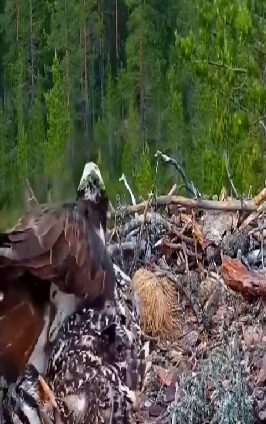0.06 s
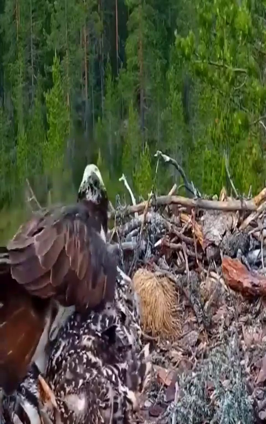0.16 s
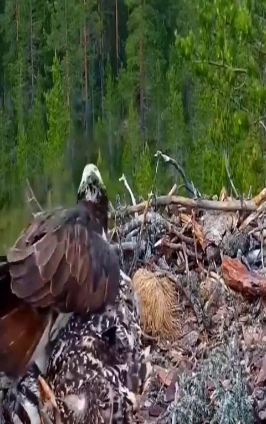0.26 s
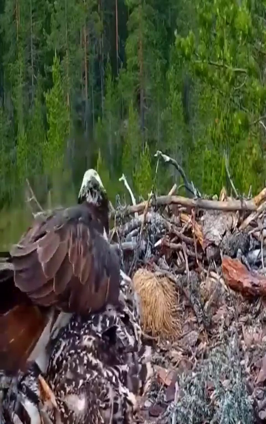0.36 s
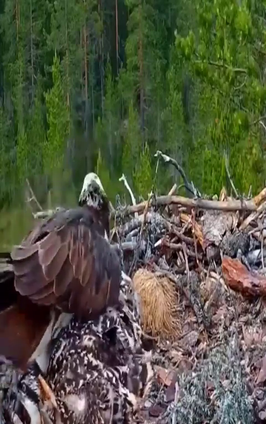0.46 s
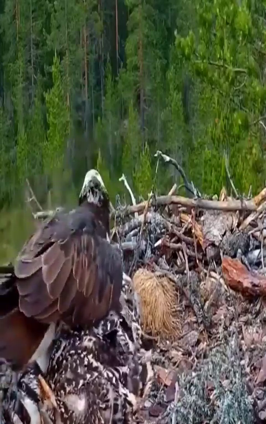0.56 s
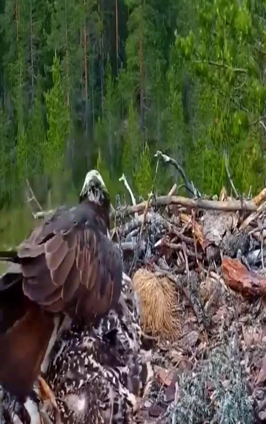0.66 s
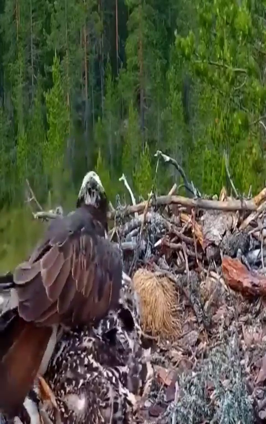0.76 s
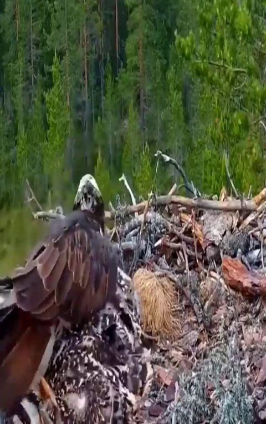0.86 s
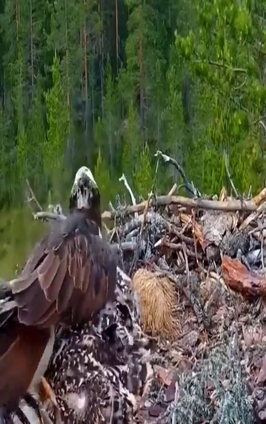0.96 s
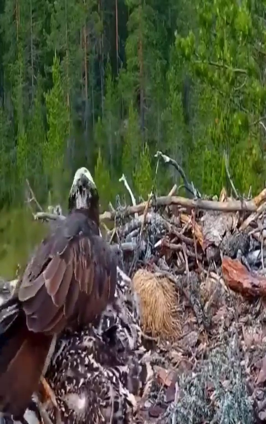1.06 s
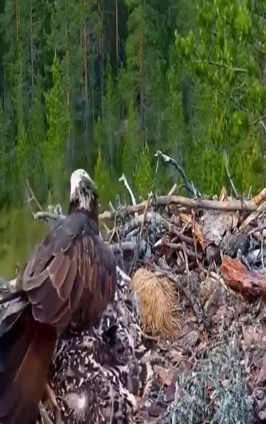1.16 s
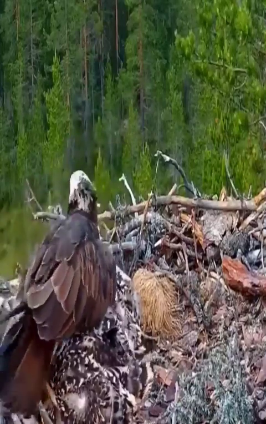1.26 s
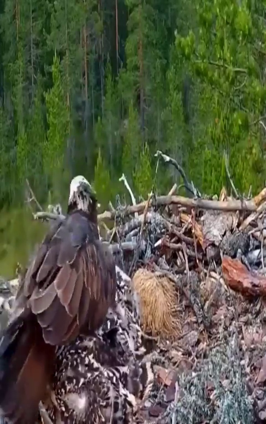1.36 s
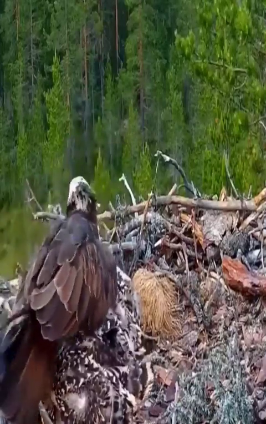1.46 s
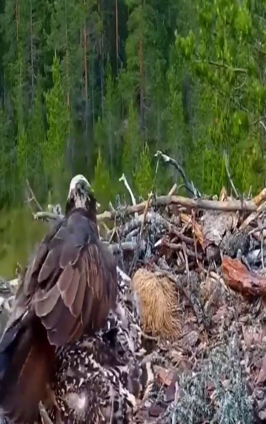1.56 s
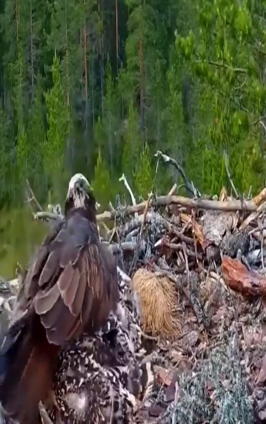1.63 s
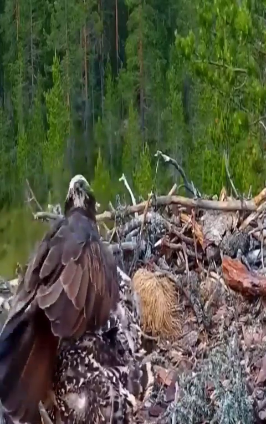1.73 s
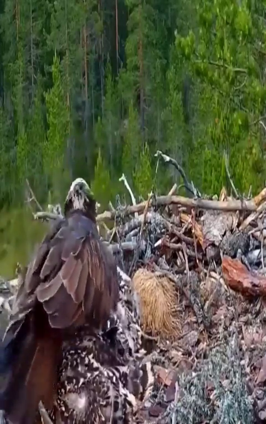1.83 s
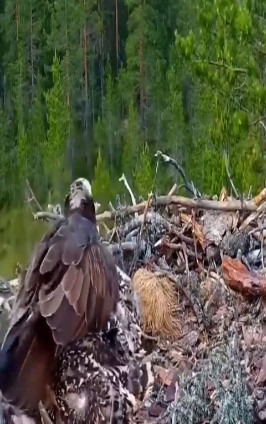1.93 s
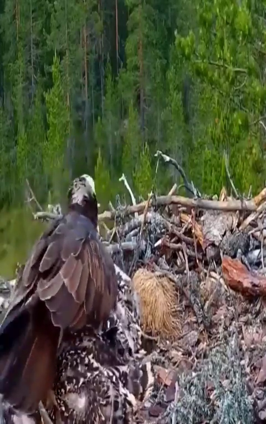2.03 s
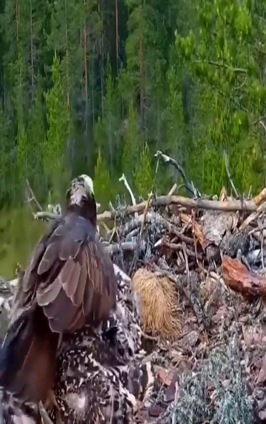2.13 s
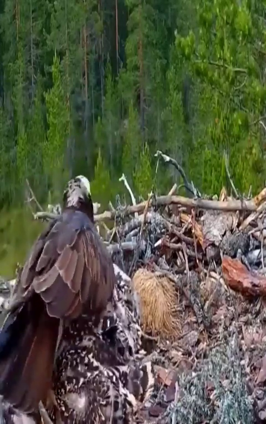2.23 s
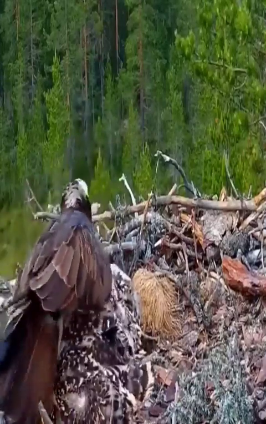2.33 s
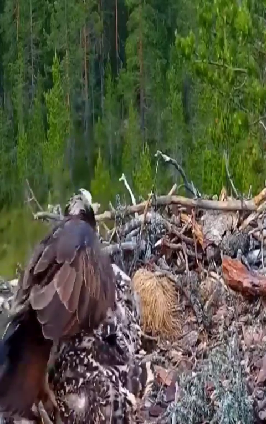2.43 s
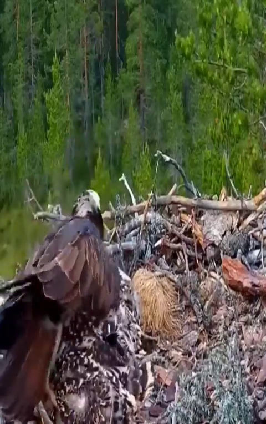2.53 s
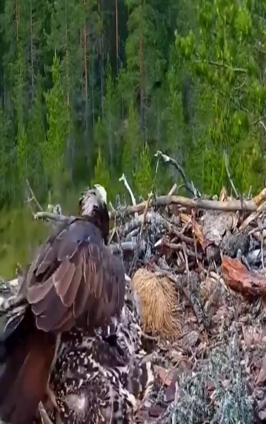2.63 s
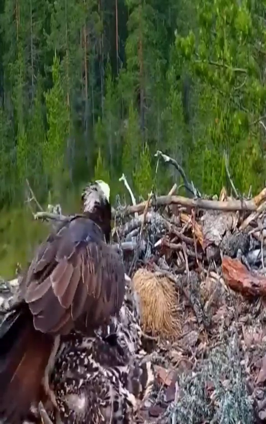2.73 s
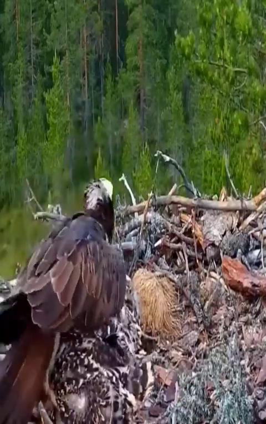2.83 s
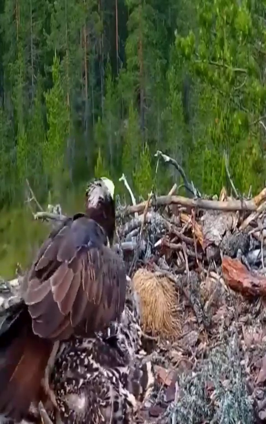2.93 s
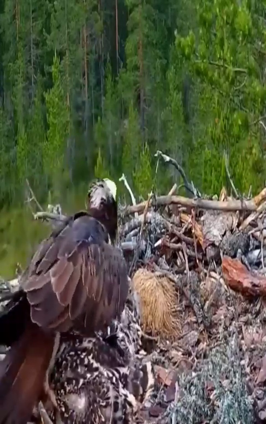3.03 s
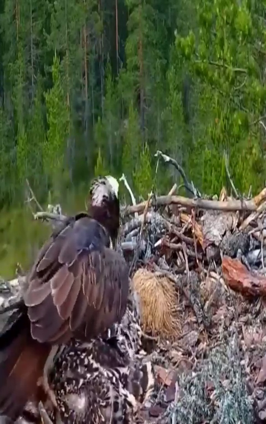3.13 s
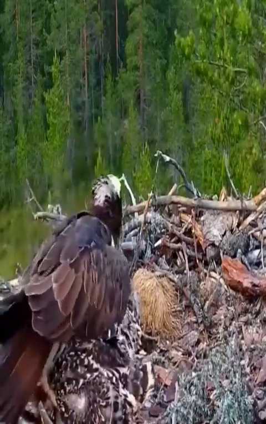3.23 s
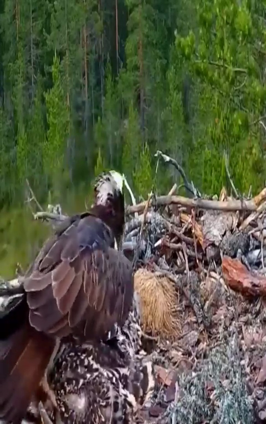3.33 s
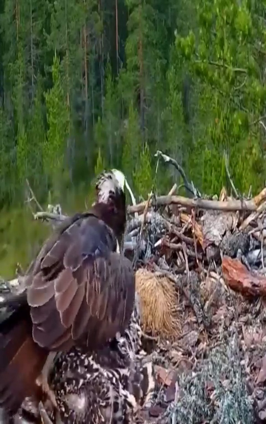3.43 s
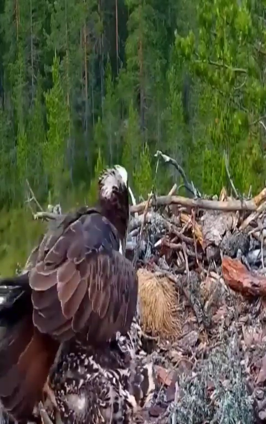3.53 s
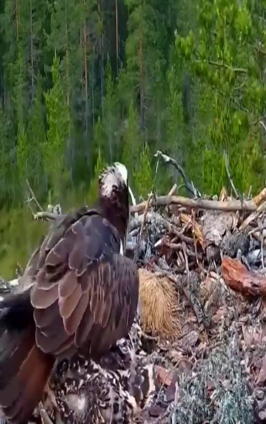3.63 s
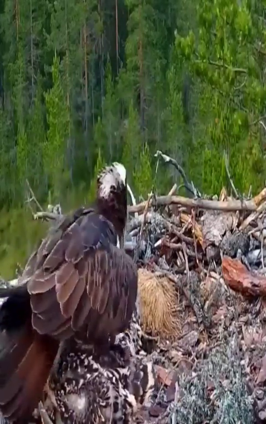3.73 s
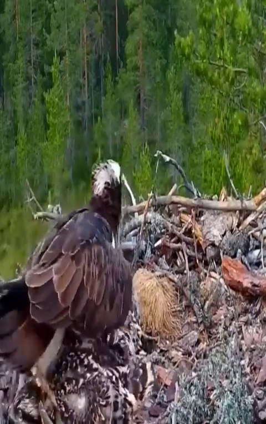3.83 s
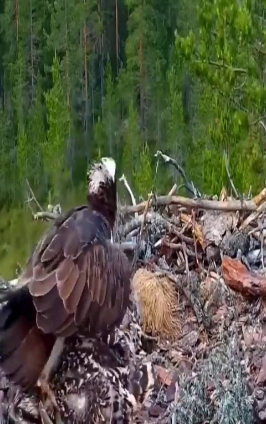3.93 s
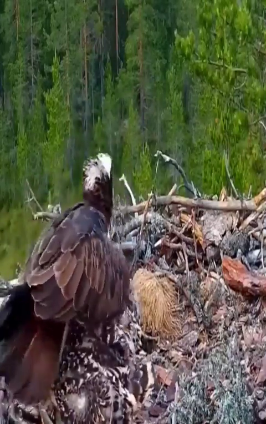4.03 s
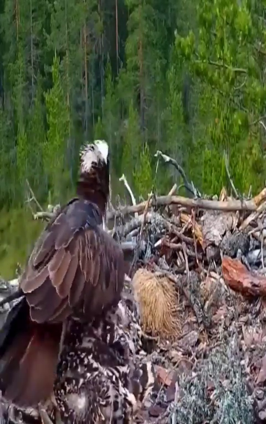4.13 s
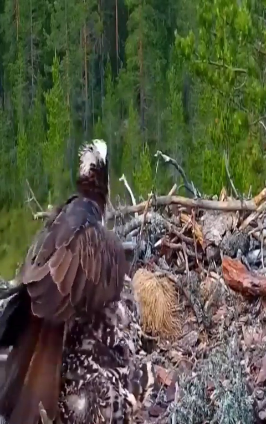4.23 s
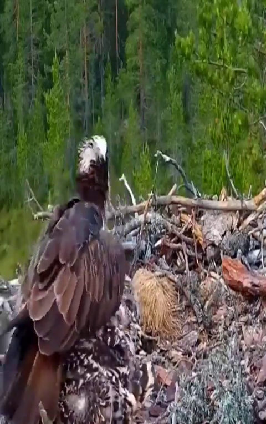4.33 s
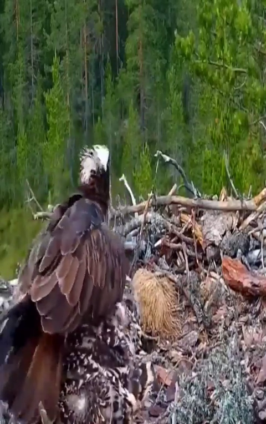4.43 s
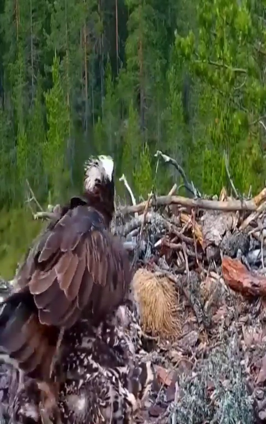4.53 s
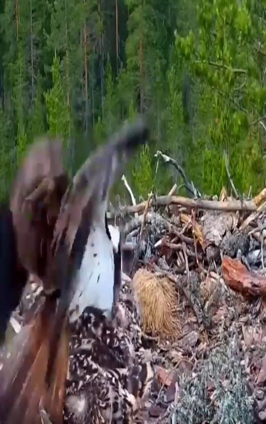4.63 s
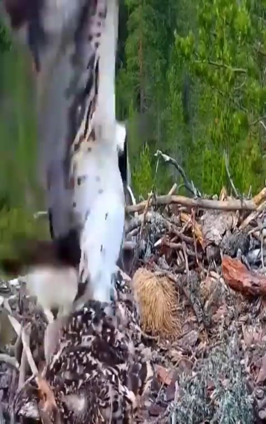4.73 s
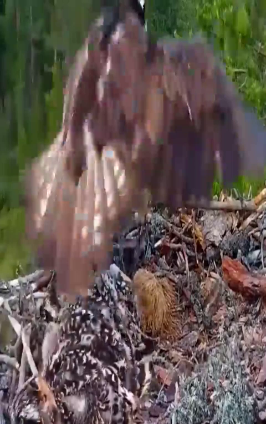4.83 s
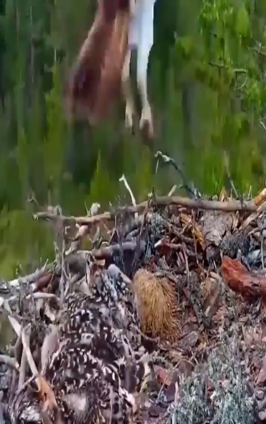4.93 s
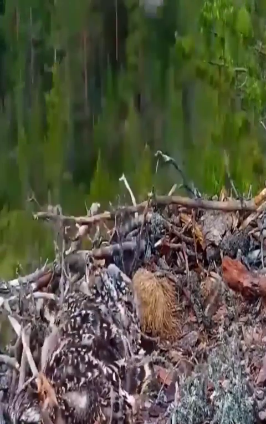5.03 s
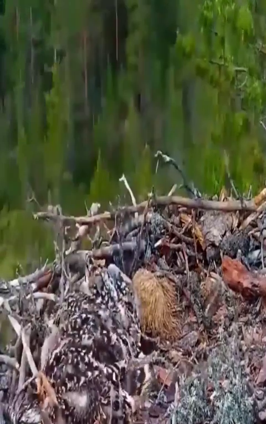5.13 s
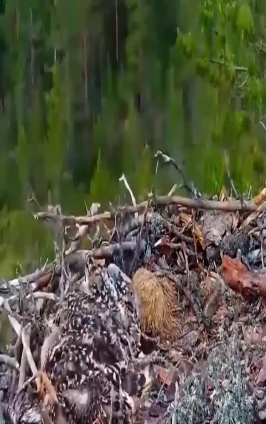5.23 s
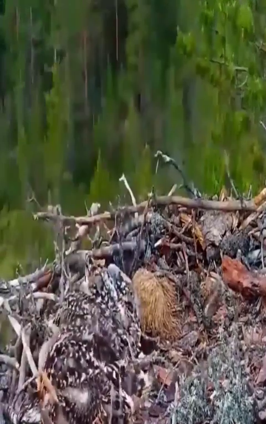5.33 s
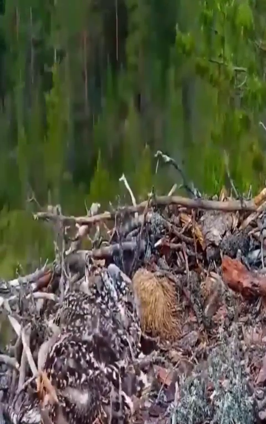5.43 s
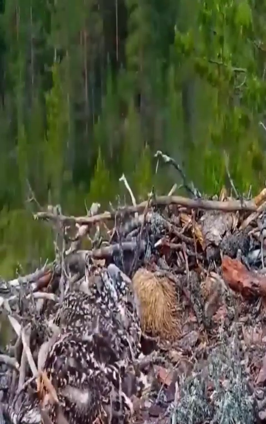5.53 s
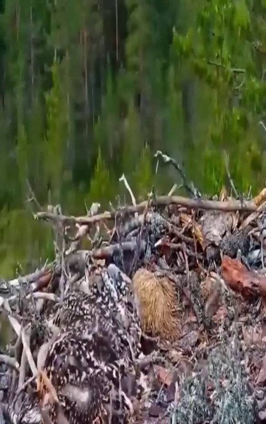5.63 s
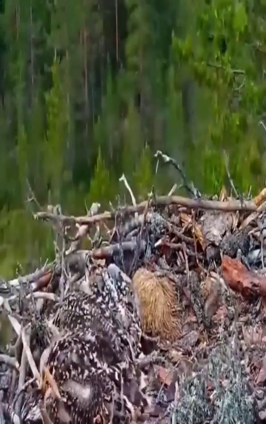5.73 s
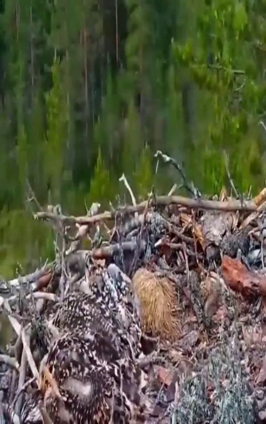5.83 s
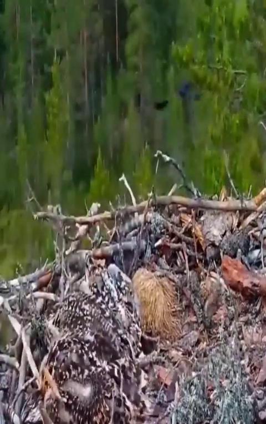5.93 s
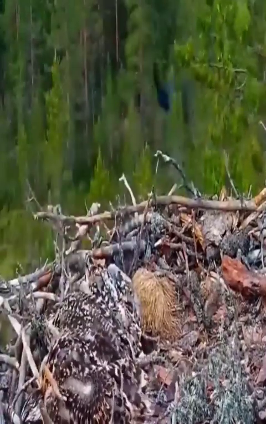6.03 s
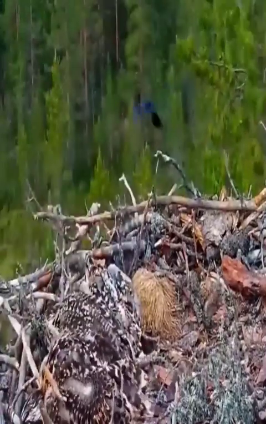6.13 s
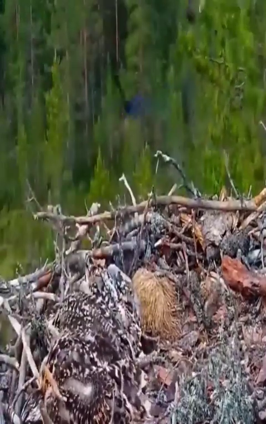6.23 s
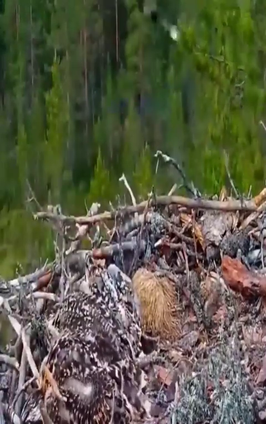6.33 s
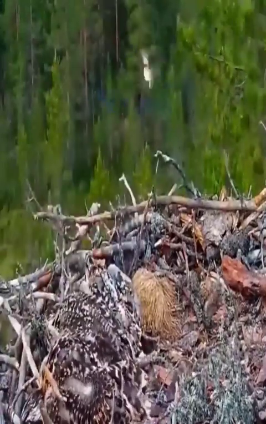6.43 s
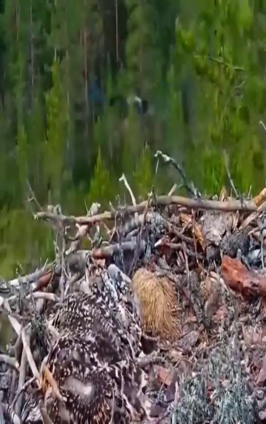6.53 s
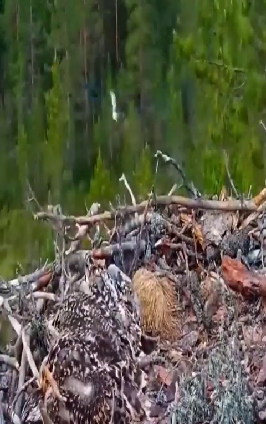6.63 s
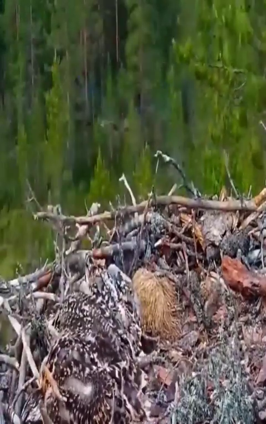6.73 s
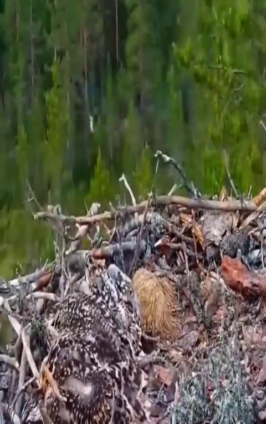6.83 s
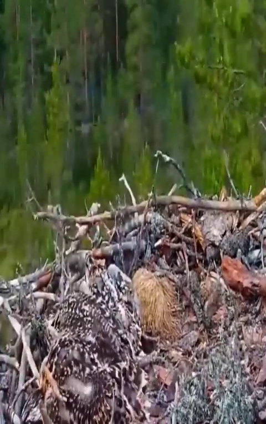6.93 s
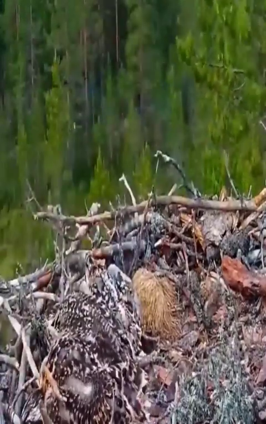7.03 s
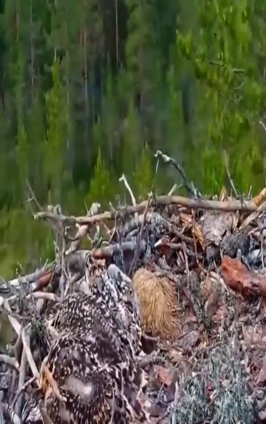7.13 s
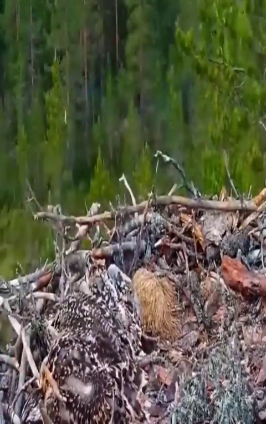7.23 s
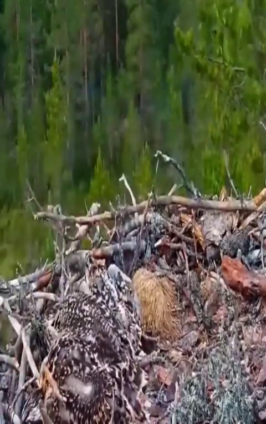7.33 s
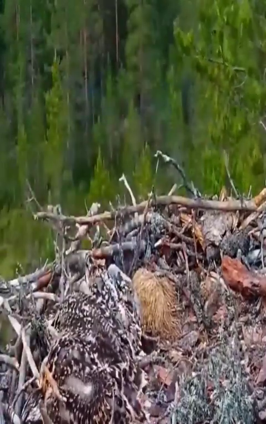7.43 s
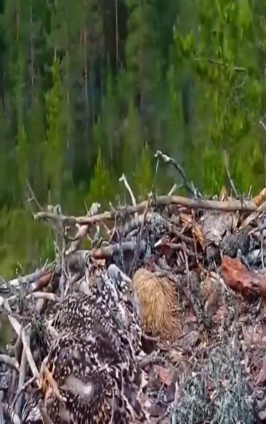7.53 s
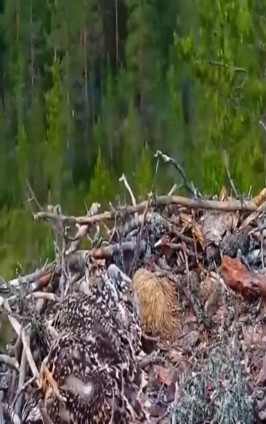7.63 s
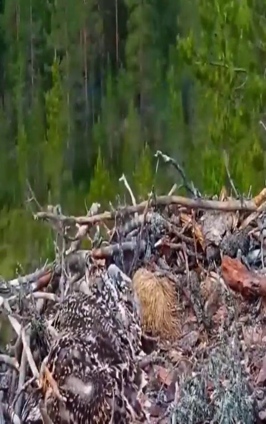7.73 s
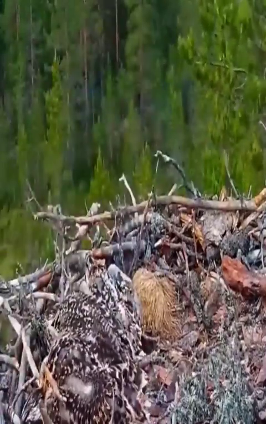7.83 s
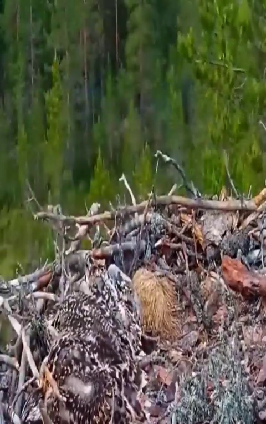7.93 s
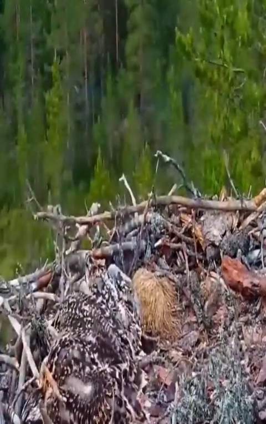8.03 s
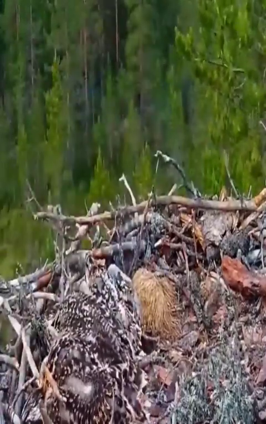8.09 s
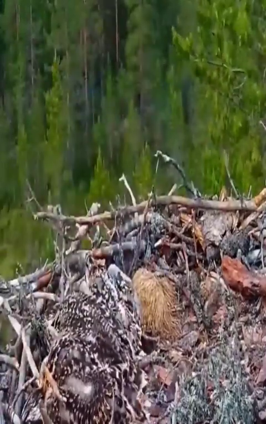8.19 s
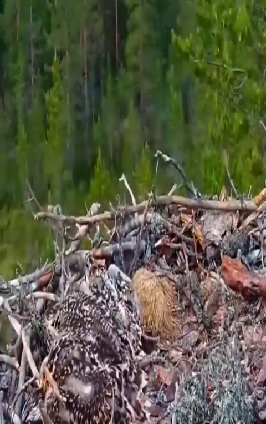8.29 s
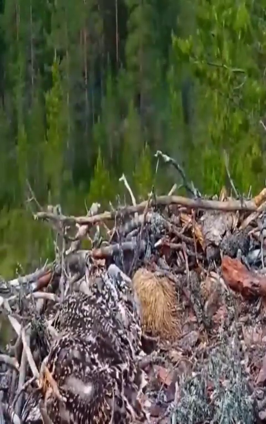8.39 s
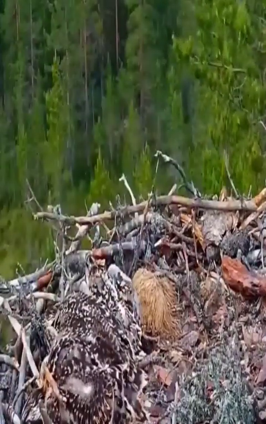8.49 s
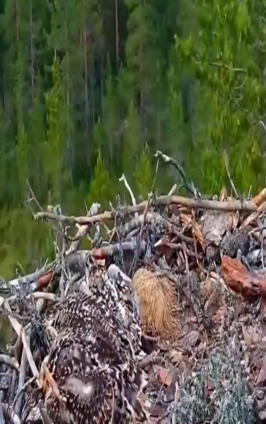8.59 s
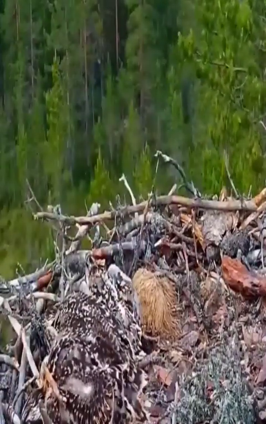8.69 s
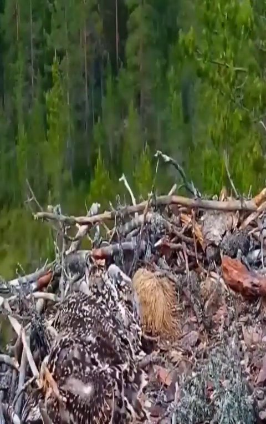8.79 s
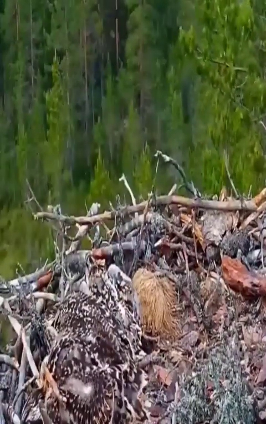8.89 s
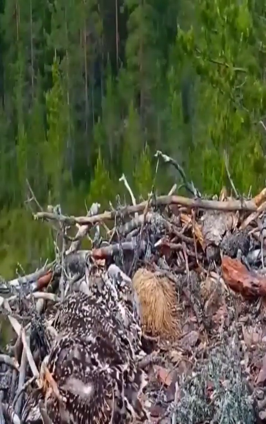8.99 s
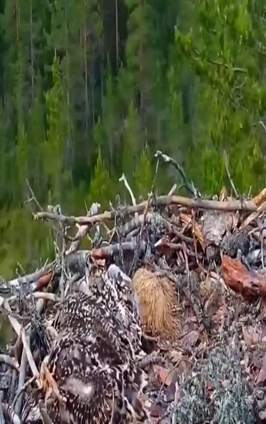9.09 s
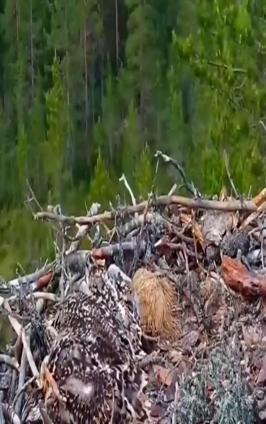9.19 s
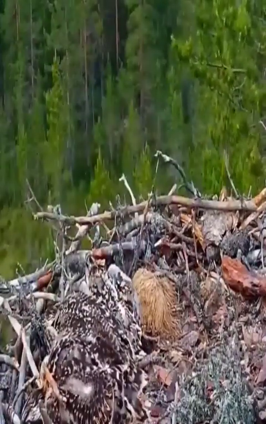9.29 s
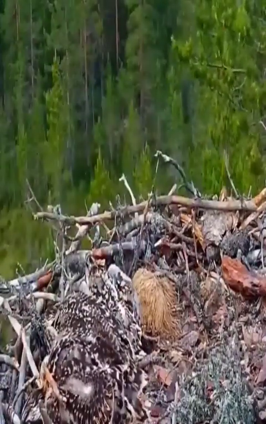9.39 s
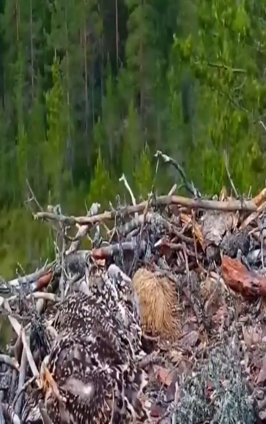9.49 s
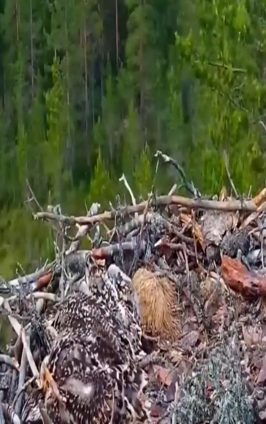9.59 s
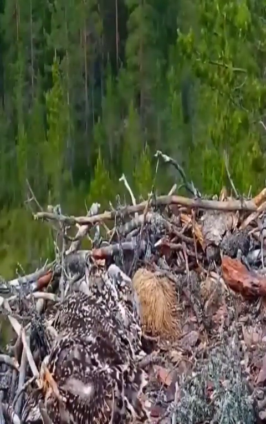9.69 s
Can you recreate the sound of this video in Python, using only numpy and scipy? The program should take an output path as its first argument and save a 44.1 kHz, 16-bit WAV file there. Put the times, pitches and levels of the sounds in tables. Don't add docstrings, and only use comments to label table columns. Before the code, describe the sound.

A fast, even string of loud, rasping bird chirps opens at once, swelling to clearer, near-pure whistles midway, then turning rougher and duller before one bright final shriek. A brief dense crackle of sticks and feathers follows at take-off. Afterwards only small, breathy, hoarse calls remain, scattered and fading in a quiet forest clearing. The close microphone strains on the loud whistles with fizz and low bumps.

```python
import sys
import numpy as np
from scipy import signal
from scipy.fft import rfft, irfft
from scipy.io import wavfile
from scipy.ndimage import uniform_filter1d

SR = 44100
rng = np.random.default_rng(int(sys.argv[2]) if len(sys.argv) > 2 else 0)


def master_out(mix):
    frames = np.transpose(np.atleast_2d(mix))
    ceiling = np.clip(frames, -1, 1)
    pcm = np.round(ceiling * 32767).astype(np.int16)
    wavfile.write(sys.argv[1], SR, pcm)


def undo_db(level):
    steps = np.asarray(level, float) / 20
    return 10 ** steps


N = 429975
TIME = np.arange(N) / SR
DEAD_BAND_HZ = 7950


def rms_one(x):
    return x / np.sqrt(np.mean(x ** 2) + 1e-20)


def smooth_twice(x, samples):
    return uniform_filter1d(uniform_filter1d(x, size=samples), size=samples)


def drift(rate_hz):
    r = np.exp(-2 * np.pi * rate_hz / SR)
    settle = 9000
    return rms_one(signal.lfilter([1], [1, -2 * r, r * r], rng.standard_normal(N + settle))[settle:])


def coloured(x, spectrum):
    hz, db = np.transpose(spectrum)
    grid = np.maximum(np.arange(N // 2 + 1) * SR / N, 1)
    shape_db = np.interp(np.log(grid), np.log(hz), db)
    return rms_one(irfft(rfft(x) * undo_db(shape_db), N))


def cut_low(x, hz):
    return signal.sosfilt(signal.butter(4, hz, "high", fs=SR, output="sos"), x)


def cut_high(x, order, hz):
    return signal.sosfilt(signal.butter(order, hz, fs=SR, output="sos"), x)


def resonate(x, modes, patchy_db):
    out = 0
    for k, (hz, width, db) in enumerate(modes):
        r = np.exp(-np.pi * width / SR)
        top = np.array([1, 0, -1]) * (1 - r * r) / 2
        ring = signal.lfilter(top, [1, -2 * r * np.cos(2 * np.pi * hz / SR), r * r], x)
        out = out + (-1) ** k * undo_db(db + patchy_db * drift(20.7)) * ring
    return out / np.sqrt(smooth_twice(out ** 2, 700) + 1e-12)


def membrane(rate, restart, jitter, uneven_db, breath):
    cycles = np.cumsum(rate * np.clip(1 + jitter * drift(150), .3, 3) / SR)
    cycles -= np.maximum.accumulate(np.where(restart, cycles - 1 + 10 / SR, 0))
    snaps = (np.diff(np.floor(cycles), prepend=0) > 0) * undo_db(uneven_db * drift(340))
    airflow = .7 + rms_one(signal.lfilter([1], [1, -.985], snaps))
    puff = rms_one(airflow) * rng.standard_normal(N)
    return rms_one(snaps) * np.sqrt(1 - breath) + puff * np.sqrt(breath)


def shaped(calls, breath_db, lead, attack, tail, tail_db):
    softer_per_db = 1.2
    level_db = np.full(N, -120.)
    for start, end, early_db, middle_db, late_db, _ in calls:
        opened = start + attack * (1 + softer_per_db * max(middle_db - early_db, 0))
        held = start + (end - start) * np.array([.25, .4, .62, .75, .9])
        times = [start - lead, start, opened, *held, end + .004, end + tail]
        levels = [early_db + 2 * breath_db, early_db + breath_db, early_db + 0.5, early_db, middle_db,
                  middle_db, late_db, late_db - 1.5, late_db + tail_db, late_db - 55.0]
        call_db = np.interp(TIME, np.sort(times), levels, left=-120, right=-120)
        level_db = np.maximum(level_db, call_db)
    starts, bright_db = np.array(calls)[:, 0], np.array(calls)[:, 5]
    which = np.maximum(np.searchsorted(starts, TIME + .003) - 1, 0)
    return level_db, uniform_filter1d(bright_db[which], size=400), TIME - starts[which]


def trees(x, level_db, t60):
    t = np.arange(SR // 4) / SR
    tail = rng.standard_normal(len(t)) * undo_db(-60 * t / t60) * (t > .004)
    return undo_db(level_db) * signal.fftconvolve(x, tail / np.sqrt(np.sum(tail ** 2)))[:N]


# f/Hz, level/dB [per Hz]
FOREST_COLOUR = [(59, -71.5), (100, -32), (718, -24), (1090, -11), (4450, -4), (5150, -7.5), (9860, -14),
                 (14200, -26), (14500, -45)]


def forest():
    return undo_db(-70 + 0.41 * drift(6.7)) * coloured(rng.standard_normal(N), FOREST_COLOUR)


# f/Hz, width [Hz], level/dB
CLEARING_MODES = [(1754, 140, -1.5), (2720, 180, -1.5), (3900, 200, 0.5)]
# t/s, level/dB
CLEARING_LEVEL = [
    (8.2, -88),
    (8.4, -70),
    (8.95, -64),
    (9.5, -68.5),
    (9.68, -83),
]


def clearing():
    level_db = np.interp(TIME, *np.transpose(CLEARING_LEVEL), left=-120)
    return undo_db(level_db) * resonate(rng.standard_normal(N), CLEARING_MODES, 1.5)


# start t/s, length [s], level/dB, brightness [dB]
FAR_CALLS = [(4.558, 0.089, -51.5, 5.5), (5.004, 0.078, -44, 2), (5.179, 0.061, -50, -4),
             (5.342, 0.096, -45.5, -1), (5.446, 0.065, -52, -0.5), (5.595, 0.026, -55.5, 0),
             (5.656, 0.086, -49, 0), (5.98, 0.09, -51.5, 0), (6.365, 0.079, -54, -7),
             (6.775, 0.076, -56.5, -4.5), (7.195, 0.16, -60, -5.5), (7.588, 0.16, -60, -5.5),
             (7.796, 0.028, -62.5, -8.5), (7.981, 0.14, -59.5, -5.5), (8.229, 0.2, -61.5, -4.5),
             (8.501, 0.2, -60.5, -1.8), (8.758, 0.2, -60.5, 0), (9.02, 0.17, -56, -6),
             (9.139, 0.15, -57.5, -1.5), (9.292, 0.33, -68.5, 2.5), (9.689, 0.071, -64, 2.5)]
# f/Hz, width [Hz], level/dB
FAR_THROAT_MODES = [(800, 200, -13), (1100, 130, -2), (1600, 140, -1), (2100, 400, -5), (2600, 190, 0)]
# f/Hz, width [Hz], level/dB
FAR_THROAT_TURNED = [(1050, 250, -8), (1380, 200, -2), (1710, 60, 1), (2150, 400, -7), (2760, 130, -1)]
# f/Hz, width [Hz], level/dB
FAR_BEAK_MODES = [(3450, 500, 1), (4050, 400, 1), (5100, 900, -8), (6200, 1000, -16)]
TURN_TIMES = (8.1, 8.6)
# t/s, spread [s], level/dB
BRIGHT_FLARE = (9.21, 0.057, 3.2)
# f/Hz, level/dB [per Hz]
FLARE_COLOUR = [(1500, -70), (2700, -20), (3800, 0), (6000, -2), (7000, -16), (9000, -50)]


def far_calls():
    calls = [(s, s + length, db, db + 0.6, db - 7, bright) for s, length, db, bright in FAR_CALLS]
    level_db, bright_db, since = shaped(calls, breath_db=-12, lead=.012, attack=.008, tail=.16, tail_db=-6)
    source = membrane(np.full(N, 240.), since < 0, jitter=.1, uneven_db=2.5, breath=.6)
    flare_s, spread_s, flare_peak_db = BRIGHT_FLARE
    flare = np.exp(-.5 * ((TIME - flare_s) / spread_s) ** 2)
    throat = resonate(source, FAR_THROAT_MODES, 1.8)
    beak = resonate(source, FAR_BEAK_MODES, 2.2)
    turned = np.interp(TIME, TURN_TIMES, [0, 1])
    turned_throat = resonate(source, FAR_THROAT_TURNED, 2.5)
    throat = np.sqrt(1 - turned) * throat + np.sqrt(turned) * turned_throat
    beak = undo_db(bright_db + flare_peak_db * flare + 1.5) * beak
    voice = undo_db(level_db + 0.1) * cut_low(throat - beak, 830)
    voice = voice + undo_db(level_db + 7.0) * flare * coloured(rng.standard_normal(N), FLARE_COLOUR)
    voice = voice + trees(voice, level_db=-6, t60=0.088)
    return cut_high(voice, 2, 6500)


# t/s, level/dB
NEST_SETTLING = [
    (4.84, -59),
    (4.93, -56.5),
    (5.0, -44.5),
    (5.2, -48.5),
    (5.32, -59.5),
    (5.52, -67.5),
    (6.03, -59.5),
    (6.14, -70.5),
    (6.8, -79.5),
]
# t/s, peak level/dB, fall [dB per s]
TWIG_BRUSHES = [(4.958, -42.5, 118), (5.091, -34.5, 480), (5.171, -36.5, 654), (5.226, -42.5, 277),
                (5.28, -52.5, 140), (5.377, -42, 794), (5.423, -45.5, 225), (5.555, -57, 350),
                (5.603, -51.5, 134), (5.725, -46.5, 180), (5.886, -48.5, 156), (6.012, -53.5, 652),
                (6.075, -46.5, 422), (6.208, -65.5, 74), (6.396, -67, 82)]


def rustle_db():
    settle_s, settle_db = np.transpose(NEST_SETTLING)
    level_db = np.interp(TIME, settle_s, settle_db)
    rise = 638
    for s, db, fall in TWIG_BRUSHES:
        below_db = np.where(TIME < s, rise * (s - TIME), fall * (TIME - s))
        level_db = np.maximum(level_db, db - below_db)
    return np.where((TIME > settle_s[0]) & (TIME < settle_s[-1]), level_db, -100)


# f/Hz, level/dB [per Hz]
TWIG_COLOUR = [(500, -25.5), (1500, -7), (3000, 0.5), (5500, 2), (7500, -4), (10000, -8.5), (14000, -18.5),
               (14500, -40.5)]
# t/s, peak level/dB
TWIG_SNAPS = [
    (4.9615, -27),
    (5.0856, -29),
    (5.095, -38),
    (5.1672, -20),
    (5.17, -17.5),
    (5.3679, -37),
    (6.0696, -34),
]


def nest():
    grains = rng.standard_normal(N) * undo_db(2.1 * drift(100))
    rustle = undo_db(rustle_db() + 7) * cut_low(coloured(grains, TWIG_COLOUR), 400)
    t = np.arange(600) / SR
    clicks = np.zeros(N)
    for s, db in TWIG_SNAPS:
        crack = rng.standard_normal(len(t)) * np.exp(-t / .0022)
        at = round(s * SR)
        clicks[at:at + len(t)] += undo_db(db - 1.5) * crack
    return rustle + signal.sosfilt(signal.butter(2, [1200, 7500], "band", fs=SR, output="sos"), clicks)


def dead_band(x):
    edges = [DEAD_BAND_HZ, DEAD_BAND_HZ + 560]
    return signal.sosfilt(signal.cheby2(4, 22, edges, "bandstop", fs=SR, output="sos"), x)


# t/s, then level/dB of top hiss, low spill and thump
CHIRP_STRAIN = [(0.08, -40, -56.5, -58), (0.28, -32.5, -54, -51), (0.45, -47, -71, -88),
                (0.61, -42, -60.5, -65), (0.78, -43.5, -56.5, -49), (0.94, -48, -62.5, -83),
                (1.12, -73, -79, -90), (1.29, -49.5, -66.5, -86), (1.46, -40.5, -56.5, -67),
                (1.63, -55, -63, -83), (1.79, -66, -78, -88), (1.95, -66, -72, -87),
                (2.11, -43, -58.5, -63), (2.29, -44, -57, -65), (2.46, -35.5, -52.5, -50),
                (2.609, -37, -52.5, -53), (2.79, -35.5, -54, -54.5), (2.97, -36.5, -50.5, -53),
                (3.14, -34.5, -50, -61), (3.3, -34.5, -52, -67), (3.48, -33, -52, -83.5),
                (3.65, -34, -52.5, -59), (3.83, -33.5, -54.5, -61), (3.99, -45.5, -69, -86),
                (4.16, -43, -67, -92), (4.329, -43.5, -64.5, -85), (4.518, -41, -68.5, -80),
                (4.7, -44.5, -68, -75), (4.781, -31.5, -50, -46.5)]
# t/s, level/dB
FLUTTER_LEAKS = [
    (.283, -51.5),
    (.785, -63.5),
    (3.137, -46),
    (3.825, -45),
]
# f/Hz, level/dB [per Hz]
TOP_HISS_COLOUR = [(6500, -25.5), (7900, -2), (8400, -12), (9200, -2.5), (11500, -1), (13000, -9),
                   (14200, -8), (14500, -38)]
# f/Hz, level/dB [per Hz]
LOW_SPILL_COLOUR = [(120, -10), (290, -2), (400, -6.5), (900, -3), (1500, -10.5), (2500, -39)]
# f/Hz, level/dB [per Hz]
HARD_STRAIN_COLOUR = [(13900, -40), (14300, 0), (15800, -3), (16200, -30)]


def strain(bird):
    chirp_s, *levels = np.transpose(CHIRP_STRAIN)
    power = smooth_twice(bird ** 2, 200)
    edges = np.r_[0, (chirp_s[1:] + chirp_s[:-1]) / 2 * SR].astype(int)
    which = np.searchsorted(edges, np.arange(N), side="right") - 1
    share = np.maximum(power, 0) / np.maximum.reduceat(power, edges)[which]
    top, low, thump = (uniform_filter1d(undo_db(db)[which], size=300) for db in levels)
    air = rng.standard_normal((4, N))
    leak = sum(undo_db(db) * np.exp(-.5 * ((TIME - s) / 0.015) ** 2) for s, db in FLUTTER_LEAKS)
    buzz = leak * np.sin(2 * np.pi * 290 * TIME)
    hiss = undo_db(-1.5) * top * share ** 0.57 * coloured(air[0], TOP_HISS_COLOUR)
    spill = undo_db(1.5) * low * share ** 0.58 * coloured(air[1], LOW_SPILL_COLOUR)
    slow = rms_one(cut_high(air[2], 2, 130))
    thumps = undo_db(5.0) * thump * share ** 1.4 * (1.3 + 0.45 * slow)
    hard = top ** 2 / undo_db(-20) * share ** .6 * coloured(air[3], HARD_STRAIN_COLOUR)
    return buzz + hard + hiss + spill + thumps


# start t/s, length [s], level/dB, swell in the middle [dB]
RASP_CALLS = [(0.018, 0.11, -33.5, 2.5), (0.203, 0.12, -34.5, 6.5), (0.383, 0.099, -34, 1),
              (0.546, 0.097, -33.5, 3.5), (0.71, 0.11, -32.5, 4.5), (0.885, 0.1, -34, 3.5),
              (1.058, 0.098, -34, 1), (1.234, 0.09, -30, -2), (1.396, 0.11, -34.5, 3.5),
              (1.573, 0.1, -33.5, 2), (1.733, 0.098, -34, 1), (1.906, 0.091, -34, 0),
              (2.065, 0.093, -33, 2), (2.231, 0.1, -33, -0.5), (2.394, 0.11, -32.5, 7.5),
              (2.55, 0.12, -36, 3.5), (2.733, 0.11, -30.5, 1), (2.903, 0.12, -31.5, 6),
              (3.085, 0.1, -28.5, 4), (3.255, 0.098, -29.5, 4), (3.425, 0.1, -29, 4.5),
              (3.595, 0.1, -30.5, 4), (3.77, 0.1, -31, 2), (3.943, 0.085, -31, 1), (4.118, 0.082, -30, 0.5),
              (4.281, 0.098, -30, 1), (4.466, 0.11, -30, -1), (4.669, 0.13, -30, 0),
              (4.74, 0.074, -23, 0.5)]
RASP_FIRST_SNAPS = [.027, .222, .396, .561, .726, .901, 1.069, 1.235, 1.414, 1.587, 1.747, 1.912, 2.075,
                    2.241, 2.413, 2.566, 2.742, 2.915, 3.097, 3.265, 3.436, 3.606, 3.779, 3.948, 4.123,
                    4.286, 4.471, 4.669]
TIRED_SPAN = (3.93, 4.73)
# from t/s, to t/s
AIRY_SPAN = (2.37, 3.05)
# f/Hz, width [Hz], level/dB
THROAT_MODES = [(1480, 504, -13.5), (2123, 190, -2), (2828, 398, 3), (3704, 415, 0.5), (3984, 119, 6.5)]
# f/Hz, width [Hz], level/dB
BEAK_MODES = [(4713, 160, 7), (5177, 150, 8), (5824, 370, 2.5), (6480, 300, -2), (7600, 447, -7)]
# t/s, level/dB
BEAK_TIP = [
    (0, -6.5),
    (1, -4),
    (2, -3),
    (3, -6),
    (3.75, -5.5),
    (3.95, -22),
    (4.6, -17),
    (4.75, -0.5),
]
# t/s, brightness [dB], duller while it opens [dB]
BEAK_GAPE = [(0, -7, 9.5), (0.797, -7.5, 10.5), (1.7, -10.5, 10), (2.25, -5, 4.5), (2.449, -3, 9.5),
             (3.098, -1.5, 3.5), (3.449, -7, 1.5), (4, -3.5, 0), (4.5, -6, -3.5), (4.66, -9.5, -10.5),
             (4.74, -1, 4.5)]
# f/Hz, level/dB [per Hz]
RASP_TOP_COLOUR = [(7000, -37.5), (8550, -18.5), (8900, 5), (10200, 9.5), (11400, -12.5), (14100, -12),
                   (14400, -36.5), (16000, -53.5)]
# start t/s, length [s], level/dB, crest pitch f/Hz, crest after start [ms]
WHISTLE_NOTES = [(.045, .072, -15.5, 3615, 46), (.258, .049, -16.5, 3610, 8), (.43, .032, -24.5, 3620, 3),
                 (.593, .033, -20, 3660, 1), (.75, .052, -16.5, 3720, 13), (.921, .04, -21, 3760, 0),
                 (1.098, .036, -24.5, 3730, 4), (1.268, .044, -19.5, 3690, 6),
                 (1.435, .05, -18.5, 3770, 10), (1.604, .044, -18.5, 3790, 7), (1.767, .04, -20.5, 3800, 7),
                 (1.933, .036, -23, 3790, 4), (2.088, .042, -19.5, 3800, 7), (2.262, .05, -18.5, 3770, 25),
                 (2.424, .064, -15.5, 4040, 16), (2.581, .068, -14.5, 4060, 28),
                 (2.753, .079, -15.5, 3970, 27), (2.936, .065, -16, 3920, 17),
                 (3.117, .041, -16.5, 3830, 14), (3.287, .035, -21, 3800, 14), (3.464, .032, -17, 3810, 1),
                 (3.64, .026, -16, 3750, 6), (3.805, .042, -16, 3790, 3), (4.743, .037, -16, 4200, 50)]
# extra level/dB, extra octave level/dB, beak opens with it [dB]
WHISTLE_EFFORT = [(-1, -4, 1.5), (-0.5, 1, 3), (0.5, -11, 12), (1, 0.5, 13.5), (-2.5, 6.5, 8.5),
                  (-0.5, 8, 11.5), (-3, 1, 10.5), (-3, -10.5, 11), (1, -1.5, 12.5), (-2, 1.5, 16),
                  (-2, 5, 15), (-2.5, -6, 15), (-1.5, -15, 16), (-1, -6.5, 18), (-0.5, 14.5, 6.5),
                  (0, 11, 2.5), (-1, 0.5, 2), (-0.5, 10, 0), (0.5, 6.5, 7), (2, -11, 13.5), (-0.5, -6, 14),
                  (-1.5, -17, 17.5), (-1.5, -3, 12.5), (-0.5, 26, -4.5)]


def rasps():
    gape_s, gape_db, shut_db = np.transpose(BEAK_GAPE)
    calls = [(s, s + length, db, db + swell, db + 1.3, np.interp(s, gape_s, gape_db))
             for s, length, db, swell in RASP_CALLS]
    level_db, bright_db, since = shaped(calls, breath_db=-16, lead=.03, attack=.0025, tail=.05, tail_db=-12)
    opening = np.exp(-np.maximum(since, 0) / .018)
    bright_db = bright_db - np.interp(TIME, gape_s, shut_db) * opening
    for (s, length, *_), (*_, open_db) in zip(WHISTLE_NOTES, WHISTLE_EFFORT):
        times = s + length * np.array([0, .3, .7, 1])
        bright_db = bright_db + np.interp(TIME, times, [0, open_db, open_db, 0])

    which = np.maximum(np.searchsorted(RASP_FIRST_SNAPS, TIME + .025) - 1, 0)
    since = TIME - np.array(RASP_FIRST_SNAPS)[which]
    drive = np.clip((since - .003) / .014, 0, 1)
    fray = np.clip((since - .045) / .025, 0, 1)
    tired = (TIME > TIRED_SPAN[0]) & (TIME < TIRED_SPAN[1])
    start_hz, full_hz = 180, np.where(tired, 229, 287)
    rate = start_hz + drive * (full_hz - start_hz)
    airy = (TIME > AIRY_SPAN[0]) & (TIME < AIRY_SPAN[1])
    breath = np.where(since < 0, .9, .12 + .06 * drive + .35 * fray + .35 * airy)
    source = membrane(rate, since < 0, jitter=.015 + .14 * fray, uneven_db=1.3 + 1.5 * fray, breath=breath)

    throat = resonate(source, THROAT_MODES, 2.4)
    beak = resonate(source, BEAK_MODES[:3], 3.0)
    tip_db = np.interp(TIME, *np.transpose(BEAK_TIP))
    beak = beak - undo_db(tip_db) * resonate(source, BEAK_MODES[3:], 3.2)
    voice = cut_high(undo_db(2) * throat - undo_db(bright_db + 3) * beak, 6, DEAD_BAND_HZ)
    hiss = coloured(source + 1.5 * rng.standard_normal(N), RASP_TOP_COLOUR)
    top = undo_db(-20.0 + .4 * bright_db) * hiss
    return undo_db(level_db) * (cut_low(voice, 1405) + top)


FULL_DB = -15.5
# t/s, depth level/dB, half width [ms]
VOICE_CATCHES = [(.286, -9, 11), (.781, -8, 8), (1.467, -8, 7), (2.456, -36, 27), (2.626, -16, 6),
                 (2.635, -11, 4), (2.816, -16, 8), (2.98, -8, 10), (2.8, -3, 8), (2.605, -2.5, 8),
                 (2.443, -16, 9), (2.465, -12, 7), (4.76, -7, 7), (4.792, -6, 5)]


def note(start, length, db, hz, crest_ms, sag=1):
    ms = np.linspace(0, 1000 * length, num=60)
    from_crest = ms - crest_ms
    falling = sag * .3 / (1 + abs(from_crest) / 40)
    pitch = hz - np.where(ms < crest_ms, .12, falling) * from_crest ** 2
    edge_ms = min(6.5 + 2.4 * max(FULL_DB - db, 0), ms[-1] / 2)
    edge_gain = undo_db(-14)
    gain = edge_gain + (1 - edge_gain) * np.minimum(np.minimum(ms, ms[-1] - ms) / edge_ms, 1)
    for s, depth_db, half_ms in VOICE_CATCHES if 3000 < hz < 4500 else []:
        dip = np.clip(1 - abs(ms - 1000 * (s - start)) / half_ms, 0, 1)
        gain = gain * (1 - (1 - undo_db(depth_db)) * dip)
    return np.transpose([start + ms / 1000, pitch, db + 20 * np.log10(gain)])


# multiple of the pitch, level/dB
HALF_PITCH_LINES = [(.5, -38), (1.5, -31)]
THIN_TOP_TONES = [10850, 11550, 14640]


def tone(rows, flutter_hz, depth, lower, octave_db, top_db):
    s, hz, db = np.transpose(rows)
    t = np.arange(s[0] - .004, s[-1] + .004, 1 / SR)
    gain = np.sqrt(2) * np.interp(t, [t[0], *s, t[-1]], [0, *undo_db(db), 0])
    pitch = np.interp(t, s, hz)
    turn = 2 * np.pi * np.cumsum(uniform_filter1d(pitch, size=300, mode="nearest")) / SR

    beat = np.exp(1j * (2 * np.pi * flutter_hz * (t - t[0]) + rng.uniform(0, 6.3)))
    wobble = signal.lfilter([1], [1, -.96], rng.standard_normal((2, len(t)))) * .28
    upper = depth * np.linspace(.6, 1.9, len(t))
    rough = depth * (.25 * beat ** 2 + .55 * (wobble[0] + 1j * wobble[1]))
    swing = 1 + upper * beat - lower / beat + rough
    swing = swing / np.sqrt(1 + upper ** 2 + lower ** 2 + .6 * depth ** 2)

    third_db = -30.5 - 40 * (depth < .12 or octave_db < -27)
    octave_db = octave_db - .07 * np.maximum(pitch - 3699, 0)
    lines = [*HALF_PITCH_LINES, (3, third_db), (2, octave_db)]
    low = sum(undo_db(line_db) * np.exp(1j * k * turn) for k, line_db in lines)

    mean_hz = hz.mean()
    steady_hz = min(THIN_TOP_TONES, key=lambda line: abs(line - 3 * mean_hz))
    glide = (steady_hz > 11000) * (turn - 2 * np.pi * mean_hz * t)
    high = np.sin(2 * np.pi * steady_hz * t + glide) + .15 * np.sin(2 * np.pi * THIN_TOP_TONES[-1] * t)
    high = undo_db(top_db) * (1 + .35 * wobble[0]) * high

    strength = gain / gain.max()
    body = np.real(swing * (np.exp(1j * turn) + strength * low))
    return round(t[0] * SR), gain * (body + strength * high)


# t/s, depth [ratio], lower side line [ratio], sag of the pitch [ratio]
WHISTLE_FLUTTER = [(.08, 0.043, 0.026, 1.15), (.28, 0.098, 0.091, 1), (.53, 0.32, 0.44, .6),
                   (.78, .15, 0.42, .9), (.95, 0.2, 0.5, .7), (1.11, 0.99, 1, .7), (1.29, .9, .5, 1),
                   (1.46, 0.3, 0.42, .9), (1.62, 0.4, 0.32, 1), (1.79, 0.83, 1, .8), (1.95, 1.2, 1, .8),
                   (2.11, 0.52, 0.23, .6), (2.29, .6, .35, .2), (2.44, 0.075, 0.13, 1),
                   (2.949, 0.033, 0.041, 1.1), (3.13, .15, 0.29, .9), (3.3, 0.46, .22, .4),
                   (3.82, 0.16, .12, .65)]
# start t/s, length [s], level/dB, crest pitch f/Hz, crest after start [ms]
SQUEAK_NOTES = [(2.438, .027, -16.5, 5200, 4), (2.464, .014, -19, 5030, 1), (3.295, .039, -25, 5030, -4),
                (3.487, .014, -24, 4860, 9), (4.315, .021, -31, 4670, -4), (4.771, .028, -17, 5430, -22),
                (3.114, .009, -24, 5020, 1), (.124, .011, -33, 2480, -15), (2.645, .013, -31, 2670, 9),
                (2.823, .016, -26, 2700, -8), (2.997, .013, -30, 2605, 9), (.605, .011, -25, 2720, 3),
                (.437, .021, -26, 2770, -1), (.121, .012, -27, 3460, 6), (4.783, .026, -17.5, 4330, -40),
                (4.808, .024, -23, 3700, 2), (4.806, .028, -28, 2720, 12), (2.77, .026, -39, 5280, 10),
                (2.772, .02, -41, 6600, 8), (2.772, .022, -41, 2640, 8), (2.645, .012, -34, 6550, 5),
                (2.575, .018, -35, 5200, 6), (2.75, .011, -31, 4900, 3), (2.821, .011, -35, 4650, 4),
                (2.931, .011, -33, 5500, 4), (.123, .013, -42, 10000, 5), (2.65, .032, -34, 3760, 22),
                (4.832, .036, -39, 3700, 18), (4.775, .022, -33, 6500, 2), (4.8, .012, -31, 7450, 4),
                (2.482, .014, -35, 6450, 8), (6.12, .05, -67, 4100, 70), (6.29, .04, -66, 4075, 75),
                (6.478, .039, -66, 3950, 36)]


def whistles():
    out, notes = np.zeros(N), []
    flutter_s, *controls = np.transpose(WHISTLE_FLUTTER)
    for row, (extra_db, extra_octave_db, _) in zip(WHISTLE_NOTES, WHISTLE_EFFORT):
        start, length, db, hz, _ = row
        depth, lower, sag = [abs(np.interp(start + length / 2, flutter_s, c)) for c in controls]
        flutter_hz = 286.5 + 4.7 * rng.standard_normal()
        purity = max(1 - depth / 0.24, 0)
        octave_db = -8 + extra_octave_db - 6.5 * purity
        top_db = -14 - 2.5 * max(FULL_DB - db, 0) - .013 * (hz - 3600) - 60 * depth
        rows = note(*row, sag) + [0, 0, extra_db]
        notes.append(tone(rows, flutter_hz, depth, lower, octave_db, max(top_db, -44)))
    notes += [tone(note(*row), 290, .3, .2, -28, -60) for row in SQUEAK_NOTES]
    for at, wave in notes:
        out[at:at + len(wave)] += wave
    return cut_low(out + 1e-18, 1500)


def scene():
    whistle = undo_db(.8) * whistles()
    strength = uniform_filter1d(whistle ** 2, size=300)
    rasp = rasps()
    chest = cut_high(rasp, 2, 2480)
    rasp = rasp - chest * strength / (strength + undo_db(-62.5))
    bird = rasp / np.sqrt(1 + strength / undo_db(-56)) + whistle
    echo = trees(bird, level_db=-24, t60=.15)
    heard = bird + echo + far_calls() + clearing() + nest() + forest()
    mono = dead_band(heard) + strain(bird)
    return np.array([mono, mono])


def roll_off(x):
    return signal.sosfilt(signal.butter(12, 16340, fs=SR, output="sos"), x)


def record(dry):
    x = .65 * np.tanh(dry / .65)
    x = x + 0.00611 * x ** 2
    x = signal.sosfilt(signal.butter(1, 22, "high", fs=SR, output="sos"), x)
    x = signal.sosfilt(signal.cheby2(10, 60, 16300, fs=SR, output="sos"), x)
    return roll_off(x)


dry = scene()
out = record(dry)
master_out(out)
```